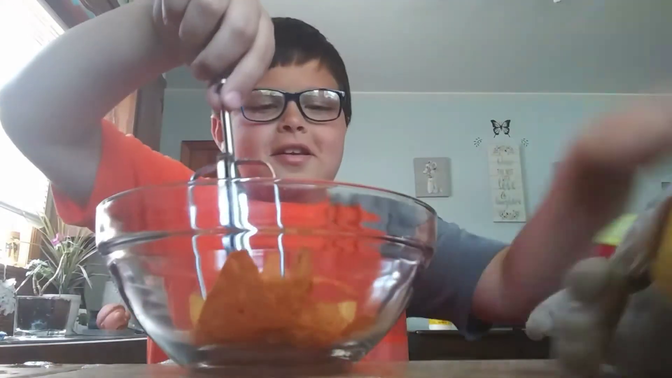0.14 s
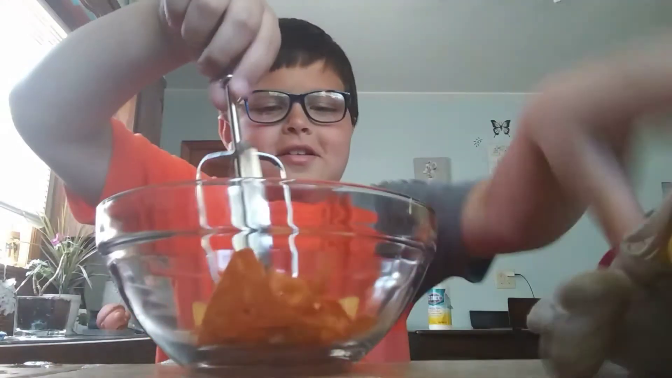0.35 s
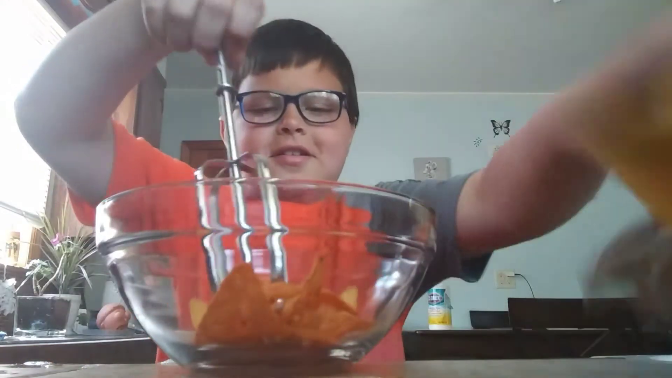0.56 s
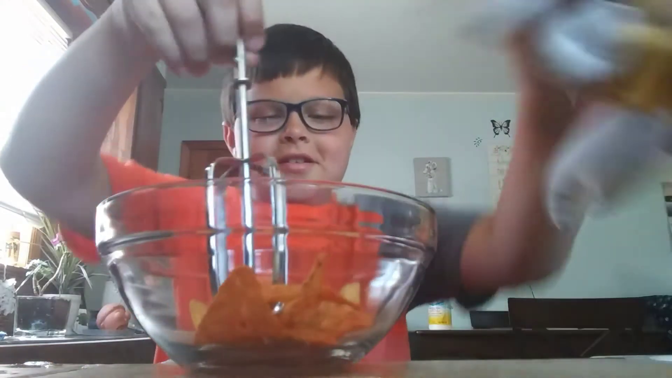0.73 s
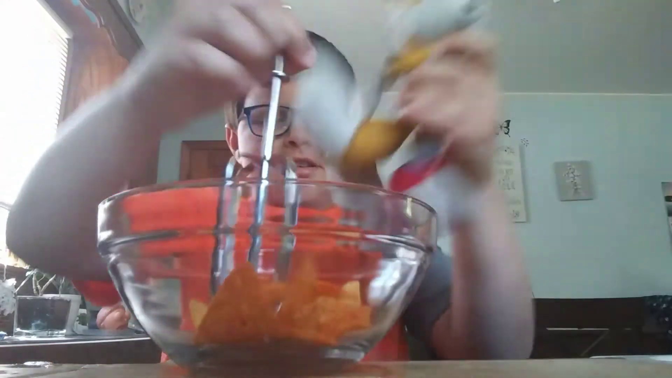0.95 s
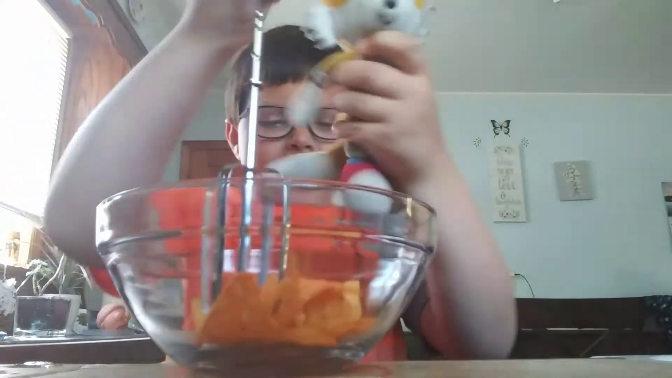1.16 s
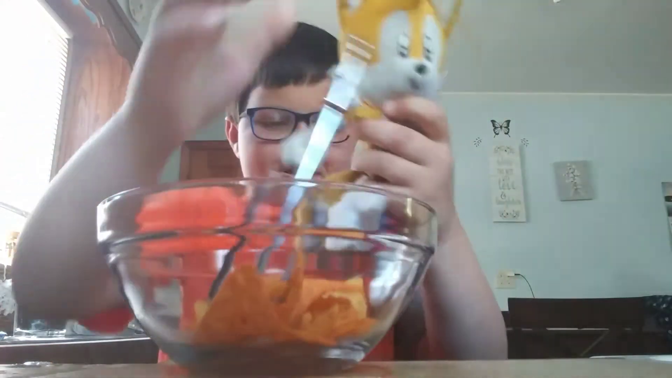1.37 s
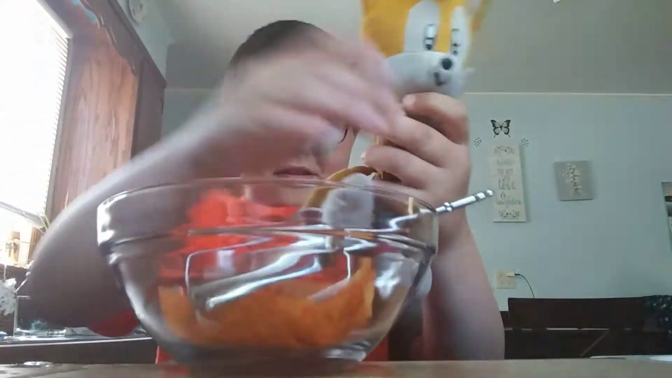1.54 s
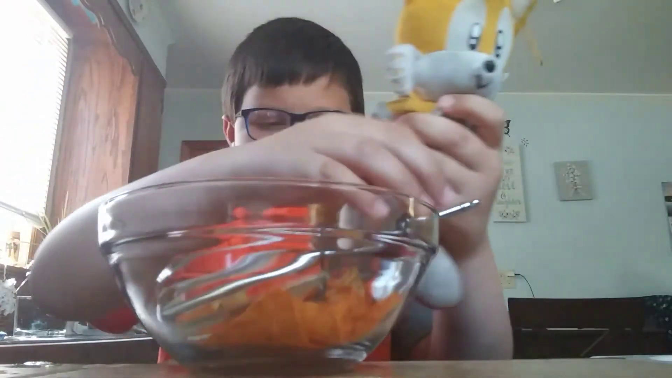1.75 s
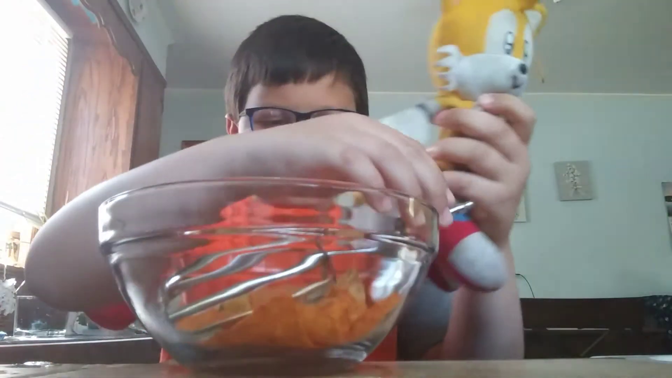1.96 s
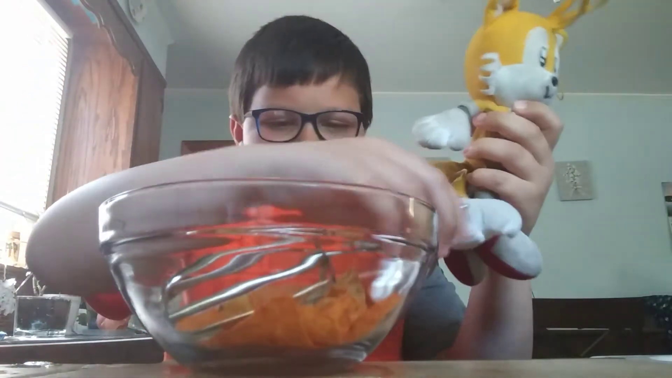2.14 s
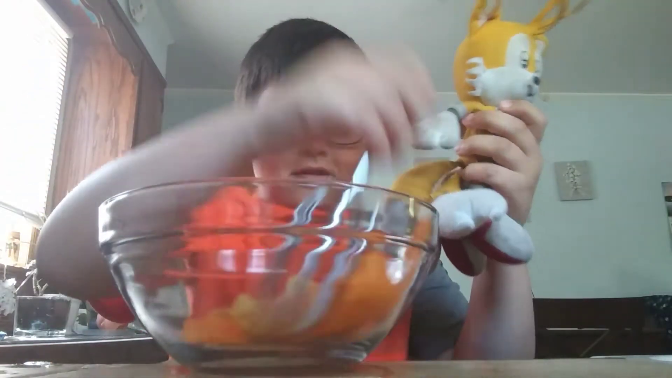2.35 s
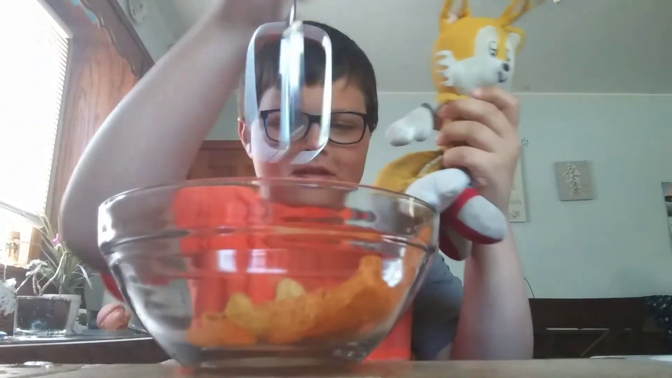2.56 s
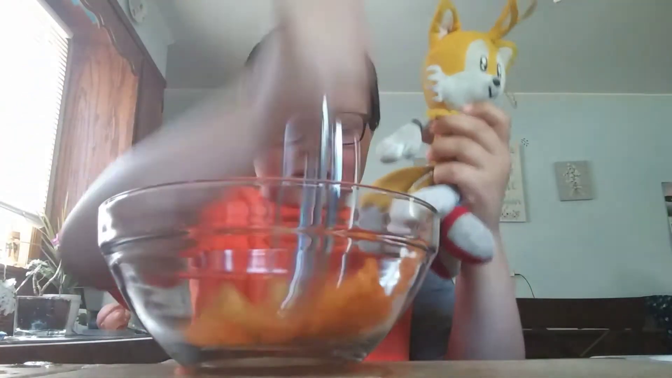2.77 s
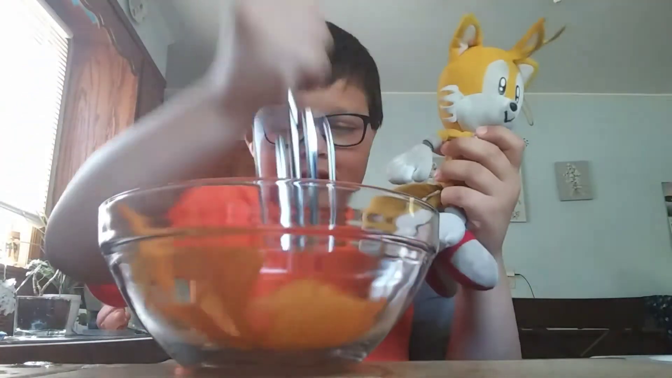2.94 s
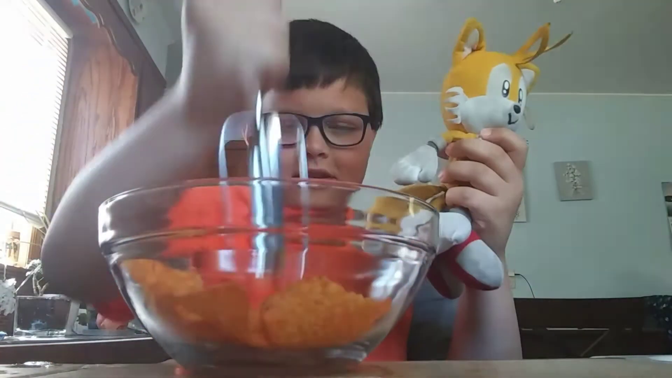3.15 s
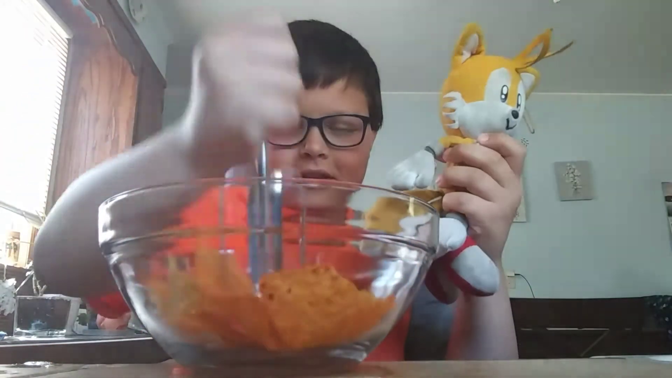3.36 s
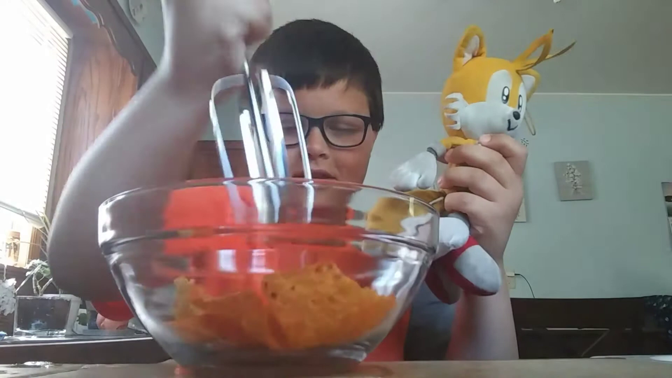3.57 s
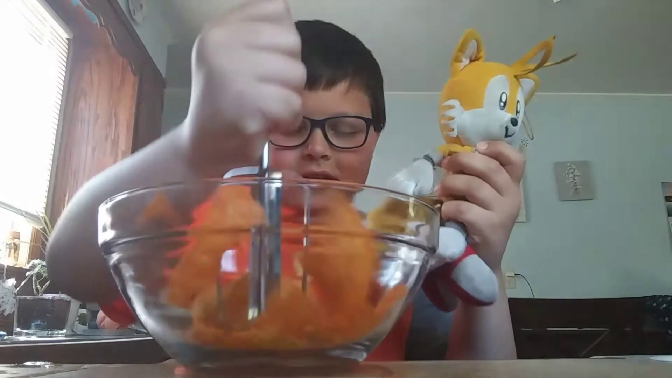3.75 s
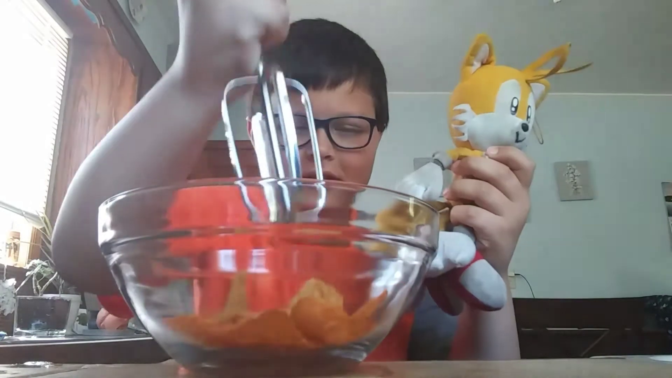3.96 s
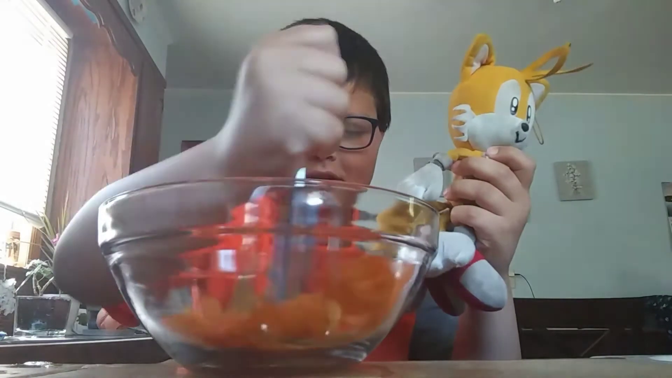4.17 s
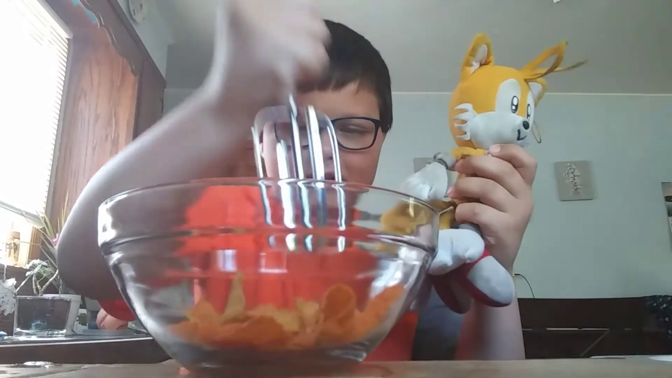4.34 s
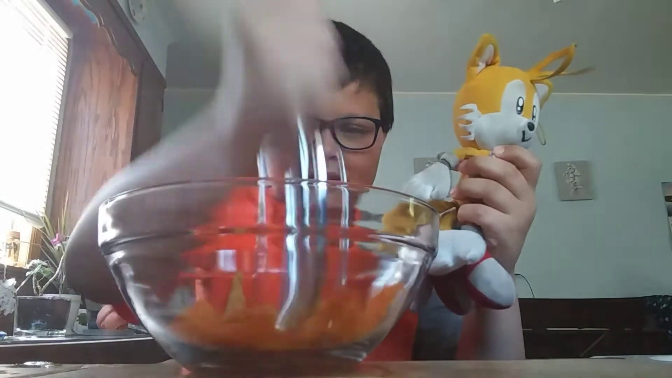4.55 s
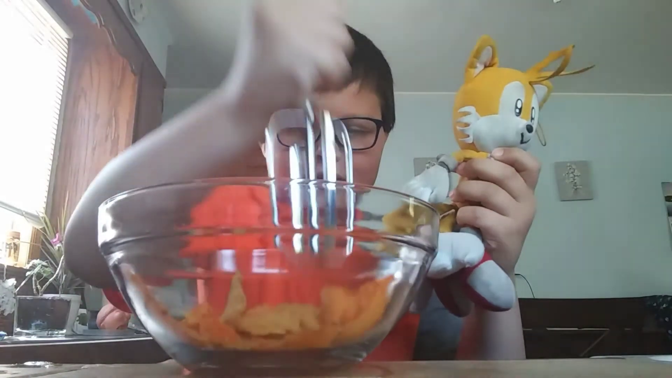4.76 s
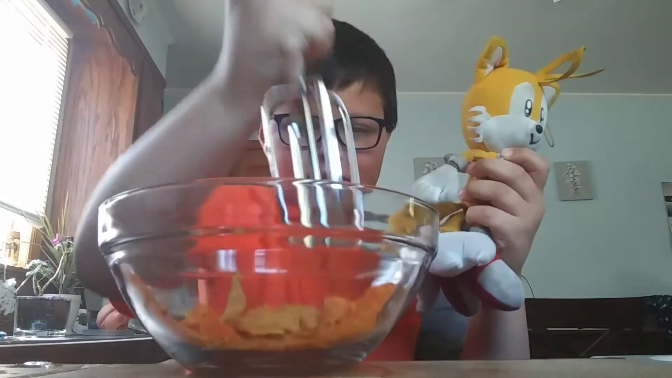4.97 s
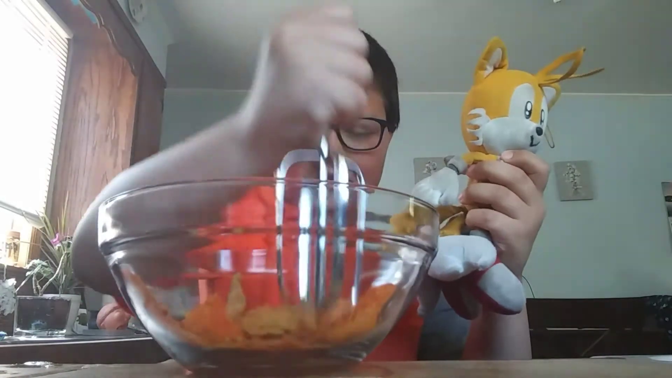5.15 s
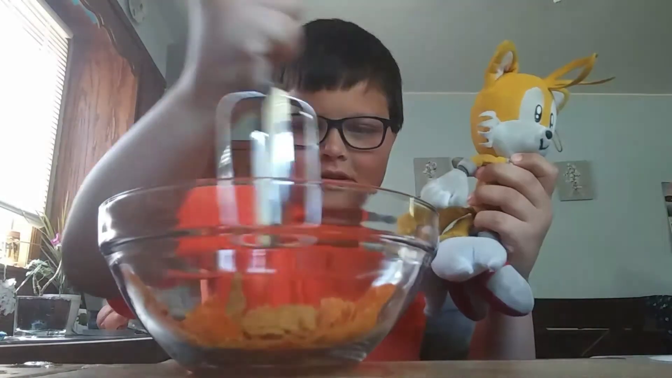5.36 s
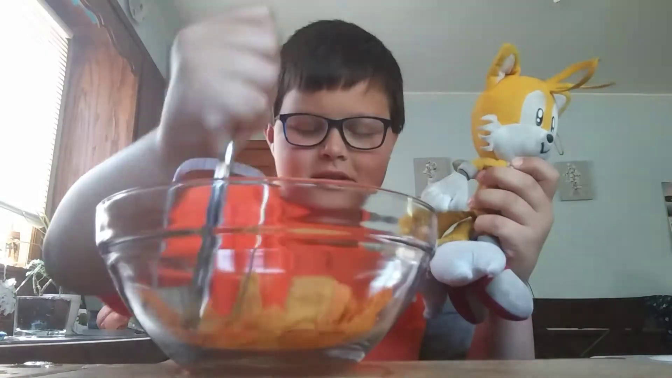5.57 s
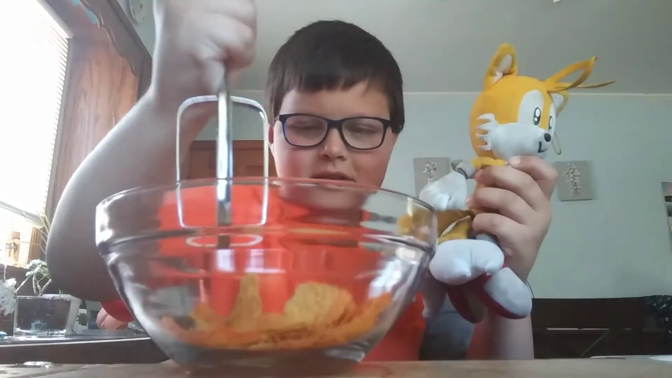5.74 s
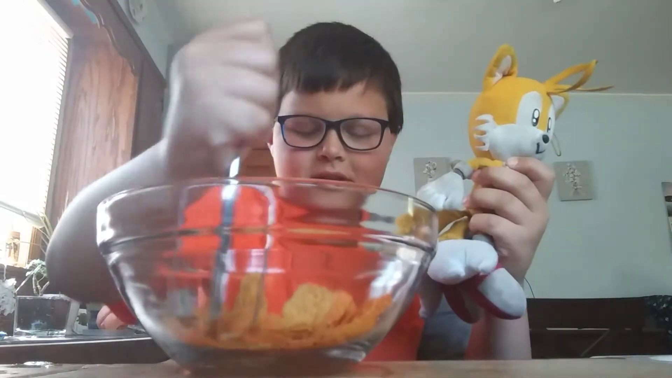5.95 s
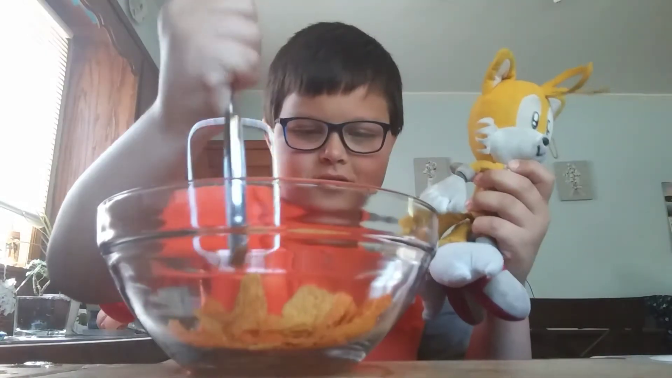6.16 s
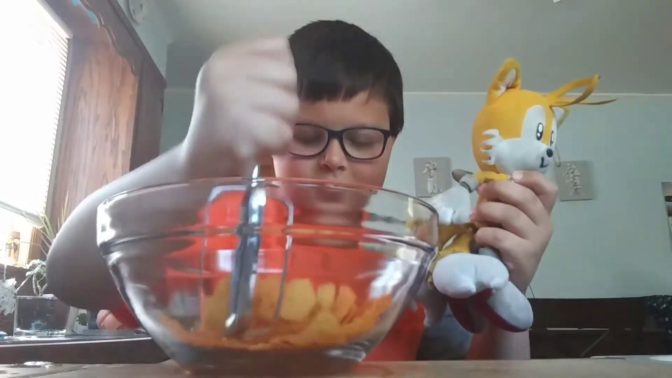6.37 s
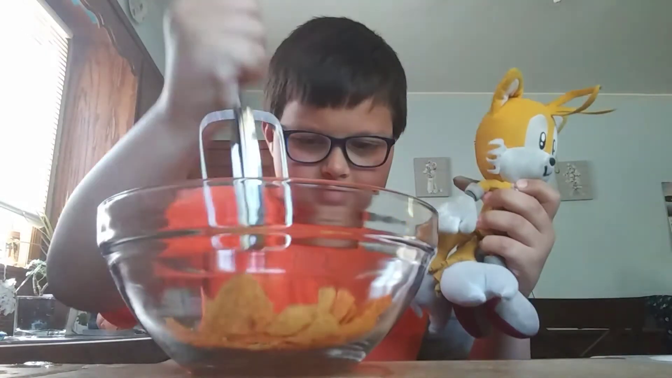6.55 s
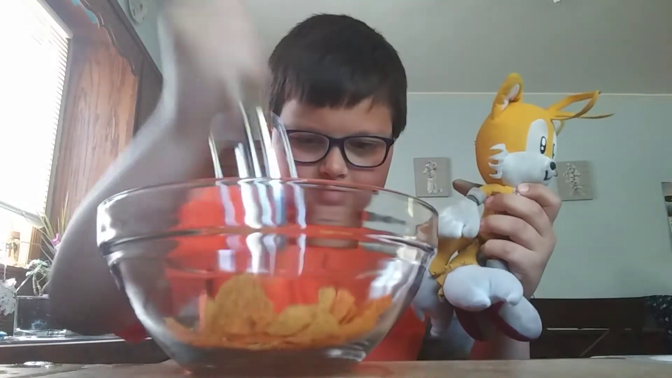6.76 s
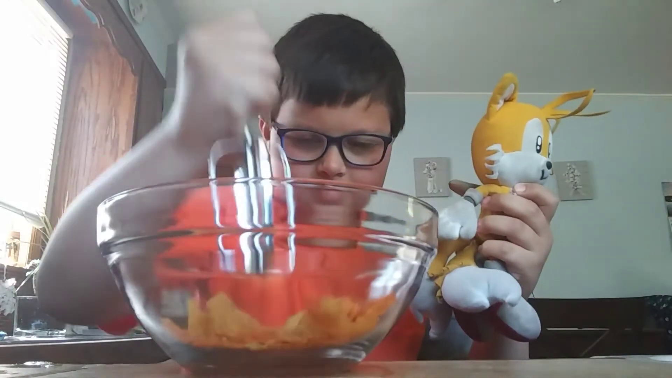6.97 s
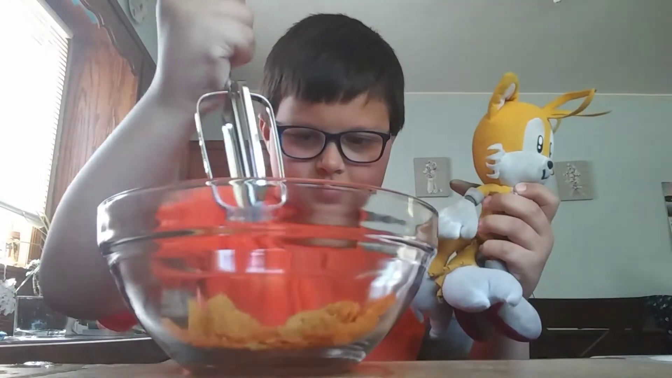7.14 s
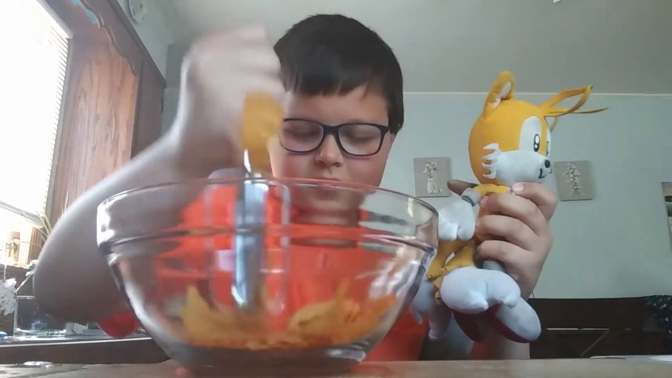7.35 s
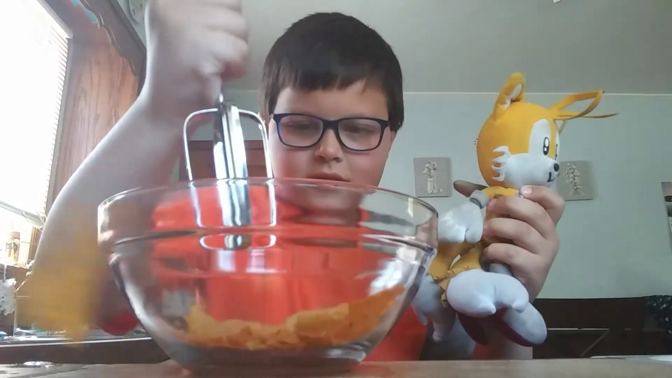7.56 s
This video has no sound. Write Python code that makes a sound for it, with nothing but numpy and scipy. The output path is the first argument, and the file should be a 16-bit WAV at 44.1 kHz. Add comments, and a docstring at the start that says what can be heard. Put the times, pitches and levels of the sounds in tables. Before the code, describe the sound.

A wire masher stirs chips in a glass bowl, making soft rustles and small crackles over the faint hush of a small kitchen. At about 1.5 seconds the masher falls against the glass with a loud crunch and a rattle of short, damped clinks, while the bowl chatters on the table. The wire shifts with a faint, dull ring near 1.9 seconds, and a few chips snap around 2.3. From 2.7 seconds the masher pounds roughly twice a second. Strokes bring brittle crunches, thuds of the bowl on the table, a bright wire ring and faint glass tones, with crumbs rustling afterwards. The hardest knocks land at about 4.5, 5, 5.5 and 5.9 seconds. Lighter crunching strokes follow near 6.3, 6.8 and 7.2, and one sharp chip snap comes at 7.5. The microphone is close, with a short room echo.

```python
"""A wire masher stirs chips in a glass bowl, in a small, quiet kitchen.
At 1.5 s it falls against the glass and rattles, damping the ring as it leans there, then shifts loosely.
From 2.7 s it pounds: strokes crack the chips, thud the bowl on the table, ring the wire and tap the
glass; crumbs rustle after them. A small close microphone with a fast limiter ducks the peaks."""
import sys
import numpy as np
from scipy import signal
from scipy.fft import rfft, irfft, next_fast_len
from scipy.io import wavfile

SR = 44100
rng = np.random.default_rng(int(sys.argv[2]) if len(sys.argv) > 2 else 0)


def wrap_up_sound(samples):
    """Save the sound to the file named by the first command line argument, as 16-bit audio."""
    columns = np.atleast_2d(samples).T
    # keep every value between -1 and 1, then stretch to whole-number steps
    tamed = np.clip(columns, -1, 1)
    steps = np.round(tamed * 32767).astype(np.int16)
    wavfile.write(sys.argv[1], SR, steps)


N = 335601


def from_db(db):
    """Decibels to gain."""
    return 10 ** (np.asarray(db) / 20)


def unit_rms(x):
    """Scale to rms 1."""
    return x / np.sqrt(np.mean(x ** 2) + 1e-20)


def coloured(x, spectrum):
    """Filter by (f/Hz, level/dB) points; minimum phase keeps cracks causal."""
    f_hz, level_db = np.transpose(spectrum)
    grid_hz = np.linspace(1, SR / 2, 513)
    gain = from_db(np.interp(np.log(grid_hz), np.log(f_hz), level_db, left=-45))
    cepstrum = np.fft.irfft(np.log(gain))
    cepstrum[1:512] *= 2
    cepstrum[513:] = 0
    fir = np.fft.irfft(np.exp(np.fft.rfft(cepstrum)))
    return signal.oaconvolve(x, fir / np.sqrt(np.sum(fir ** 2)))[:N]


def cracks(per_s, spread_db):
    """Random clicks of uneven size; rms 1."""
    sizes = from_db(spread_db * np.minimum(rng.exponential(1, N), 4)) * rng.standard_normal(N)
    return unit_rms(sizes * (rng.random(N) < per_s / SR))


def ring(clicks, f_hz, t60_s):
    """One mode: a unit click starts a decaying sine of height 1."""
    r, w = from_db(-60 / (t60_s * SR)), 2 * np.pi * f_hz / SR
    return signal.lfilter([0, np.sin(w)], [1, -2 * r * np.cos(w), r * r], clicks + 1e-18)


def shards(per_s, spread_db, cycles, spectrum):
    """Each crack rings a few cycles at one of 18 pitches; rms 1."""
    clicks = cracks(per_s, spread_db)
    pitch_index = rng.integers(0, 18, N)
    pitches_hz = np.geomspace(900, 15000, 18)
    rings = sum(ring(clicks * (pitch_index == k), hz, cycles / hz) * hz
                for k, hz in enumerate(pitches_hz))
    return unit_rms(coloured(rings, spectrum))


def add_burst(envelope, start_s, level_db, swell_s, hold_s, t60_s):
    """Add one swell, hold and decay to an envelope."""
    i = round(start_s * SR)
    t = np.arange(min(SR // 2, N - i)) / SR
    rise = np.clip(t / max(swell_s, 1e-4), 0, 1)
    decay_db = 60 * np.maximum(t - swell_s - hold_s, 0) / t60_s
    envelope[i:i + len(t)] += from_db(level_db - 15 * (1 - rise) - decay_db)


# room noise spectrum: f/Hz, level/dB
HUSH_SPECTRUM = [(59, -65), (100, -28), (162, -20), (467, 1.5), (1430, -10.5), (2810, -17.5), (3540, -19),
                 (6390, -16.5), (8060, -26.5), (15500, -30)]


def hush():
    """Steady, faint noise of the house."""
    return from_db(-60) * coloured(rng.standard_normal(N), HUSH_SPECTRUM)


def kitchen(x, t60_s=0.35, wall_cut_hz=15200):
    """Wall echoes: twelve feedback delays whose treble dies sooner."""
    size = next_fast_len(N + SR)
    f_hz = np.arange(size // 2 + 1) * SR / size
    bin_t60_s = t60_s / np.sqrt(1 + (f_hz / wall_cut_hz) ** 2)
    lags_s = np.geomspace(.011, .043, 12) * rng.uniform(.96, 1.04, 12)
    response = 0
    for k, lag_s in enumerate(lags_s):
        round_trip = from_db(-60 * lag_s / bin_t60_s) * np.exp(-2j * np.pi * f_hz * lag_s)
        response += (-1) ** k * round_trip / (1 - round_trip)
    return irfft(rfft(x, size) * response, size)[:N]


# stirring envelope: t/s, level/dB
STIR_CURVE = [(0, -44.5), (.37, -52.5), (.402, -39), (.56, -43), (.62, -50), (.858, -59.5), (.944, -37),
              (1.024, -50), (1.106, -39.5), (1.312, -62.5), (1.42, -47.5), (1.932, -52), (2.014, -80),
              (2.302, -35.5), (2.572, -62), (2.7, -78)]
# crumbs settling after strokes: t/s, level/dB, hold/s
SETTLE_BURSTS = [(2.78, -38, .16), (3.2, -40, .16), (3.68, -35, .06), (4.12, -37, .03), (4.66, -41.5, .01),
                 (5.08, -50, .01), (5.61, -55, .01), (6.31, -40.5, .01), (6.81, -41, .01), (7.24, -46, .16),
                 (7.47, -50, .01)]
# crumb spectrum: f/Hz, level/dB
CRUMB_SPECTRUM = [(710, -19), (1200, -9.5), (1470, -17), (1750, -5.5), (2860, -1), (3430, -12), (4380, -2),
                  (6310, 0.5), (8700, -19), (15500, -24.5)]


def rustle(clumps_per_s=45, clump_db=2.2):
    """Crumbs tick and slip in clumps; the bowl's hollow adds a low band that rumbles after thuds."""
    stir_s, stir_db = np.transpose(STIR_CURVE)
    tick_env = from_db(np.interp(np.arange(N) / SR, stir_s, stir_db, right=-120))
    for t_s, level_db, hold_s in SETTLE_BURSTS:
        add_burst(tick_env, t_s, level_db, swell_s=.04, hold_s=hold_s, t60_s=.34)
    clump_samples = np.arange(0, N + SR, SR / clumps_per_s)
    slip_db = clump_db * rng.standard_normal(len(clump_samples))
    tick_env *= from_db(np.interp(np.arange(N), clump_samples, slip_db))
    hollow_env = from_db(-7) * tick_env
    for t_s, level_db, hold_s, _ in BOWL_THUDS:
        add_burst(hollow_env, t_s, level_db - 27, swell_s=0, hold_s=hold_s, t60_s=.55)
    hollow_band = signal.butter(2, [300, 1400], "band", fs=SR, output="sos")
    hollow = unit_rms(signal.sosfilt(hollow_band, cracks(per_s=4000, spread_db=3.4)))
    ticks = shards(per_s=11000, spread_db=2.2, cycles=12, spectrum=CRUMB_SPECTRUM)
    return tick_env * ticks + hollow_env * hollow


# masher shifting on the chips: t/s, level/dB
MASHER_SHIFTS = [(1.858, -50.5), (1.880, -40.5), (1.900, -37.5), (2.125, -55)]
# wire loop modes: f/Hz, level/dB, t60/s
WIRE_MODES = [(1276, 2, 0.14), (1760, 1, 0.14), (2324, -7, .15), (2900, 0, 0.12)]


def masher():
    """The wire loops ring dully when the loose masher shifts."""
    clicks = np.zeros(N)
    for t_s, level_db in MASHER_SHIFTS:
        clicks[round(t_s * SR)] = from_db(level_db)
    return sum(from_db(db) * ring(clicks, hz, t60_s) for hz, db, t60_s in WIRE_MODES)


# bowl knocked on the table: t/s, level/dB, hold/s, wire ring/dB
BOWL_THUDS = [(1.478, -14, .042, -14), (1.524, -12.5, .058, -25), (1.597, -23, .049, -45),
              (1.698, -25, .022, -45), (2.711, -19, .036, -26), (3.17, -13, .012, -24),
              (3.63, -21.5, .03, -17), (4.06, -22.5, .0075, -45), (4.081, -21, .016, -26.5),
              (4.539, -9, .024, -14), (4.574, -16, .046, -15), (5.004, -7, .006, -28),
              (5.02, -12, .006, -45), (5.045, -22, .015, -50), (5.438, -17.5, .028, -30),
              (5.496, -9, .01, -27), (5.518, -10, .008, -45), (5.55, -18, .02, -50),
              (5.872, -10.5, .012, -45), (5.9, -10, .01, -43), (5.926, -9, .008, -50),
              (5.945, -17, .01, -50), (6.28, -22, .02, -25), (6.768, -19, .029, -30),
              (7.208, -22, .028, -34)]
# modes of bowl on table top: f/Hz, level/dB, t60/s
TABLE_MODES = [(400, -20, .05), (511, -9.5, 0.039), (690, -6, 0.038), (861, -4, 0.034), (965.4, -3, 0.058),
               (1034, -6, 0.12), (1150, -3.5, 0.056), (1400, -5.5, 0.025), (2068, -4.5, 0.01)]


def thuds():
    """The bowl chatters on the table: bursts of soft knocks into their modes."""
    force = np.zeros(N)
    for t_s, level_db, hold_s, _ in BOWL_THUDS:
        add_burst(force, t_s, level_db, swell_s=0, hold_s=hold_s, t60_s=.04)
    force *= cracks(per_s=4000, spread_db=2)
    return from_db(-23) * sum((-1) ** k * from_db(db) * ring(force, hz, t60_s)
                              for k, (hz, db, t60_s) in enumerate(TABLE_MODES))


# wire on glass: t/s, level/dB, favoured f/Hz, loss away from it/(dB/octave), rim twin offset/dB
WIRE_TAPS = [(1.468, -1, 5850, 24, -20), (1.469, -12, 2750, 20, -20), (1.484, -8, 1560, 13, -20),
             (1.485, -8, 4209, 26, -9), (1.524, -6, 730, 4, -12), (1.525, -9, 5850, 16, -9),
             (1.553, -13, 730, 7, -3), (1.577, -3, 5850, 24, -4), (1.578, -15, 2750, 20, -4),
             (1.612, -9, 5850, 20, -3), (1.62, -20, 2750, 12, -3), (1.709, -19.5, 2750, 10, 3),
             (1.717, -15, 5850, 12, 3), (1.744, -24, 5850, 8, -5), (2.290, -41, 4209, 9, -5),
             (2.805, -30, 1560, 16, -14), (2.835, -33, 2750, 24, -3), (2.866, -29, 4209, 24, -3),
             (3.640, -33, 730, 9, -3), (3.690, -35, 1560, 14, -13), (3.720, -33, 2750, 20, -13),
             (4.165, -45, 2050, 6, -5), (4.288, -45, 3700, 12, -3), (4.545, -23.5, 1560, 13, 0),
             (4.605, -33, 730, 12, 3), (5.006, -33.5, 730, 6, -10), (5.441, -26, 2750, 22, -5),
             (5.499, -27, 1560, 20, -12), (5.900, -27, 1560, 20, -18), (5.905, -37, 2750, 20, -9),
             (6.283, -41.5, 730, 6, -5), (6.770, -36, 730, 12, -6), (7.215, -37.5, 730, 6, -6),
             (7.326, -38, 2750, 7, -10)]
# bowl modes by family (hum, rim, rim twin, second rim, third rim, wall): f/Hz, level/dB, t60/s
BOWL_FAMILIES = [
    [(730, 2, 0.56)],
    [(1558, -1, 1)],
    [(1568, 2.5, 0.82)],
    [(2753, 0.5, 0.6), (2770, -10, .5)],
    [(4210, 1.5, 0.5)],
    [(5850, 3.5, .45), (5777, -4, 0.51), (7625, -10, 0.4), (9600, -20, 0.42), (11700, -18, 0.35),
     (13790, -20, .35), (15300, -26, .3)],
]
# bright metallic ring of the masher wire on each knock: f/Hz, level/dB, t60/s
MASHER_RING_MODES = [(6300, -9, .22), (6410, -1, 0.28), (6510, -4.5, 0.2), (6640, -7, 0.25),
                     (6880, -5, 0.2), (8670, -19, 0.2), (9485, -20, 0.15), (10260, -16, .12),
                     (10070, -12, .13), (12400, -22, .15), (14160, -16, .14)]


def glass_and_wire(lean_until_s=1.8, lean_t60_ratio=0.43, chatter_t60_s=.12, twin_family=2):
    """Taps ring the glass by where they land, knocks ring the wire; both chatter. Leaning damps them."""
    tap_s, tap_db, favoured_hz, loss_db_per_oct, twin_db = np.transpose(WIRE_TAPS)
    knock_s, _, _, wire_db = np.transpose(BOWL_THUDS)
    freed = round(lean_until_s * SR)
    tap_chatter_db, knock_chatter_db = np.where(np.arange(N) < freed, -32, -43), -29
    strikes = []
    for k, modes in enumerate(BOWL_FAMILIES):
        octaves_off = np.abs(np.log2(modes[0][0] / favoured_hz))
        family_db = tap_db - loss_db_per_oct * octaves_off + twin_db * (k == twin_family)
        strikes.append((tap_s, family_db, tap_chatter_db, modes))
    strikes.append((knock_s, wire_db, knock_chatter_db, MASHER_RING_MODES))
    chatter = cracks(per_s=500, spread_db=2.3)
    fade = from_db(-60 / (chatter_t60_s * SR))
    out = np.zeros(N)
    for t_s, level_db, chatter_db, modes in strikes:
        clicks = np.zeros(N)
        clicks[np.round(t_s * SR).astype(int)] = from_db(level_db)
        chatter_env = signal.lfilter([0, 1], [1, -fade], clicks + 1e-18)
        clicks += from_db(chatter_db) * chatter * chatter_env
        for hz, db, t60_s in modes:
            out[:freed] += from_db(db) * ring(clicks[:freed], hz, t60_s * lean_t60_ratio)
            out[freed:] += from_db(db) * ring(clicks[freed:], hz, t60_s)
    return out


# chip snaps and sharp bowl-on-table knocks (4.540, 5.006, 5.496, 5.904 s): t/s, level/dB, f/Hz
SNAPS_AND_KNOCKS = [(0.032, -27, 950), (0.977, -29, 6710), (1.176, -30.5, 1810), (2.264, -22, 5100),
                    (2.314, -21.5, 6430), (2.713, -5, 1600), (2.931, -15.5, 2750), (3.972, -33.5, 1570),
                    (4.024, -42, 1560), (4.161, -12, 2900), (4.244, -22.5, 3230), (4.520, -4, 3100),
                    (4.540, -6, 1035), (4.996, -22, 1055), (5.006, -4, 1035), (5.496, -3, 1040),
                    (5.904, -8.5, 1150), (6.366, -36, 970), (6.367, -21, 2980), (6.384, -33.5, 6580),
                    (7.325, -23.5, 5850), (7.335, -28, 2750), (7.481, -1.5, 5000)]


def snaps_and_knocks(cycles=10, length=2000):
    """A chip breaks or the bowl hits the table: a click and a few cycles of ring."""
    out, click = np.zeros(N + length), signal.unit_impulse(length)
    for t_s, level_db, f_hz in SNAPS_AND_KNOCKS:
        i = round(t_s * SR)
        out[i:i + length] += from_db(level_db) * (ring(click, f_hz, cycles / f_hz) + 0.6 * click)
    return out[:N]


# chips crushed: t/s, level/dB, swell/s, hold/s, treble offset/dB
CRUSH_BURSTS = [(0.027, -35, 0.0028, .006, -6.5), (0.385, -29.5, 0.0027, 0.011, -12),
                (0.417, -28, .003, 0.0086, -13.5), (0.939, -34.5, .003, 0.0069, -2),
                (1.094, -41, .003, .01, 0), (2.112, -45, 0.015, 0.025, -13),
                (1.418, -28, 0.0034, 0.057, -8), (1.467, -11, 0.0005, 0.025, 0),
                (1.578, -12.5, .002, 0.012, 0.5), (1.710, -17, 0.0077, 0.037, -7.5),
                (2.712, -9.5, 0.0005, 0.03, -2), (2.922, -29, 0.0084, 0.0095, -1),
                (3.148, -12, 0.021, 0.0095, -1.5), (3.605, -9, 0.021, 0.024, 0),
                (3.969, -45.5, .002, .004, -2), (4.023, -46, .002, .003, -5), (4.33, -48, .01, .016, 1),
                (4.058, -20, 0.0032, 0.0079, -0.5), (4.081, -25, 0.003, 0.006, 4),
                (4.158, -25, .002, 0.0038, -3), (4.285, -42, .002, 0.0047, -1),
                (4.514, -7, 0.008, 0.042, -1), (5.004, -8, .002, 0.005, -9), (5.431, -21, 0.012, 0.024, 3),
                (5.495, -24, 0.0018, 0.015, -8.5), (5.870, -17, 0.0022, 0.012, 2),
                (6.227, -23, 0.0047, 0.02, -4), (6.274, -26, 0.009, 0.011, 2), (6.746, -30, .003, .015, -3),
                (6.763, -15.5, 0.01, 0.014, -1), (7.204, -16.5, 0.008, 0.017, 1.5),
                (7.324, -37.5, .002, 0.01, -1.5), (7.478, -22, .001, 0.0014, -4.5)]
# chip spectrum: f/Hz, level/dB
CHIP_SPECTRUM = [(710, -21.5), (1200, -7.5), (1320, -11), (2510, -12.5), (2740, -9.5), (5790, -5.5),
                 (6580, 0), (8240, -16.5), (14900, -20), (15500, -27.5)]


def crushing(split_hz=4000):
    """Chips break in dense brittle cracks; the treble share varies by stroke."""
    low_env, high_env = np.zeros((2, N))
    for t_s, level_db, swell_s, hold_s, treble_db in CRUSH_BURSTS:
        add_burst(low_env, t_s, level_db, swell_s, hold_s, t60_s=.08)
        add_burst(high_env, t_s, level_db + treble_db, swell_s, hold_s, t60_s=.09)
    crunch = shards(per_s=14000, spread_db=2, cycles=11, spectrum=CHIP_SPECTRUM)
    low = signal.sosfilt(signal.butter(2, split_hz, fs=SR, output="sos"), crunch)
    return low_env * low + high_env * (crunch - low)


def scene():
    """Hush, rustle and the blows with their room echo; mono."""
    blows = crushing() + snaps_and_knocks() + masher() + thuds() + glass_and_wire()
    return (hush() + from_db(-23) * kitchen(blows) + rustle() + blows)[None]


def record(dry, bass_cut_hz=150, limit_db=-3.2, release_db_per_s=601, soft_hz=15600, steep_hz=16800):
    """Bass cut, instant-attack limiter, then a soft and a steep low-pass."""
    x = signal.sosfilt(signal.butter(4, bass_cut_hz, "high", fs=SR, output="sos"), dry)
    over_db = np.maximum(20 * np.log10(np.abs(x) + 1e-9) - limit_db, 0)
    release_db = release_db_per_s * np.arange(N) / SR
    duck_db = np.maximum.accumulate(over_db + release_db, axis=1) - release_db
    x = x * from_db(-duck_db)
    x = signal.sosfilt(signal.cheby2(6, 25, soft_hz, fs=SR, output="sos"), x)
    return signal.sosfilt(signal.cheby2(14, 70, steep_hz, fs=SR, output="sos"), x)


dry = scene()
out = record(dry)
wrap_up_sound(out)
```